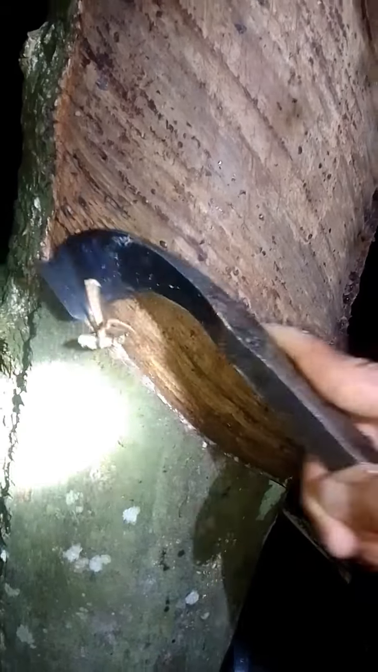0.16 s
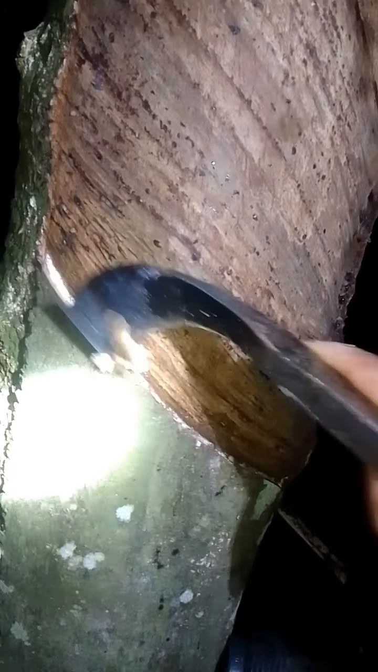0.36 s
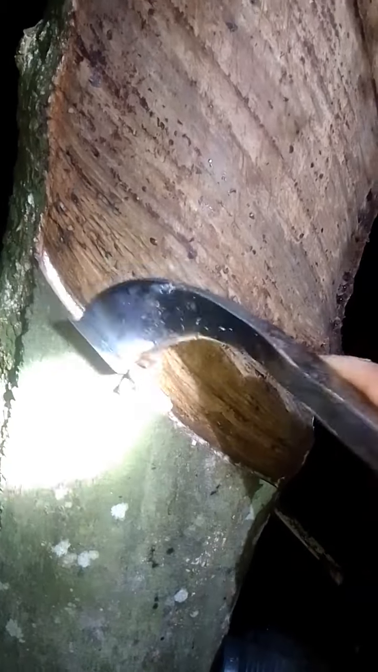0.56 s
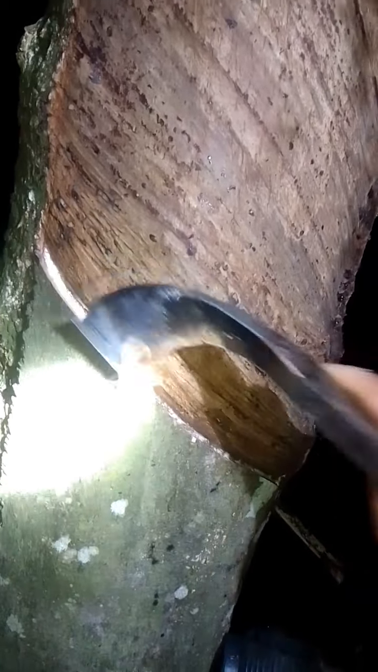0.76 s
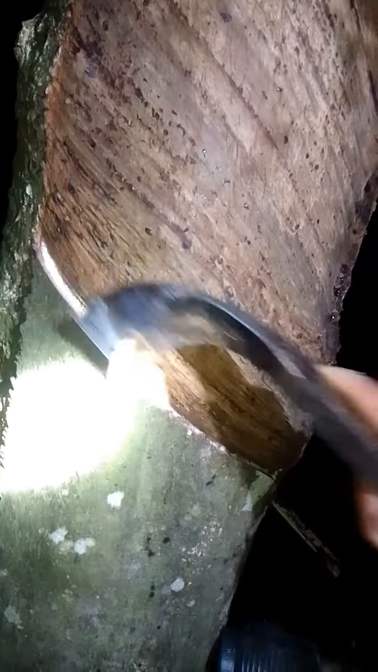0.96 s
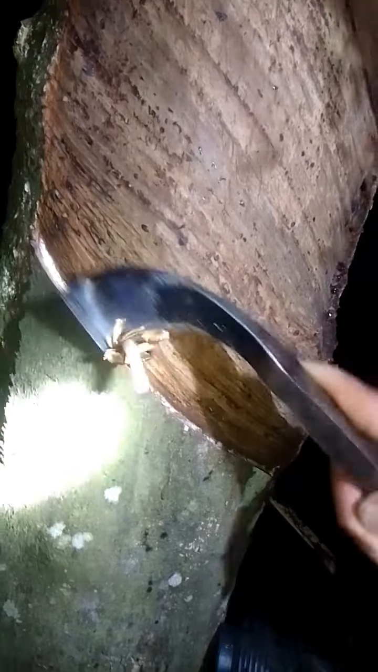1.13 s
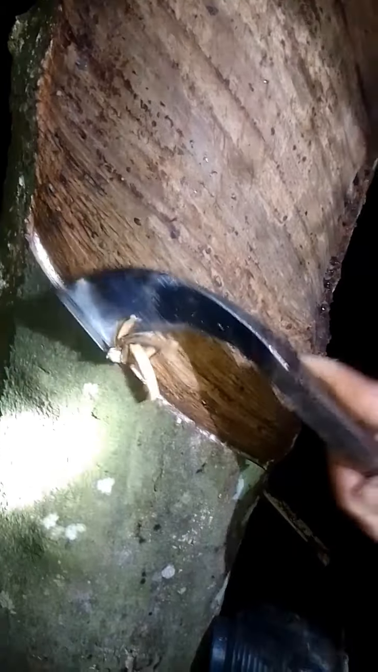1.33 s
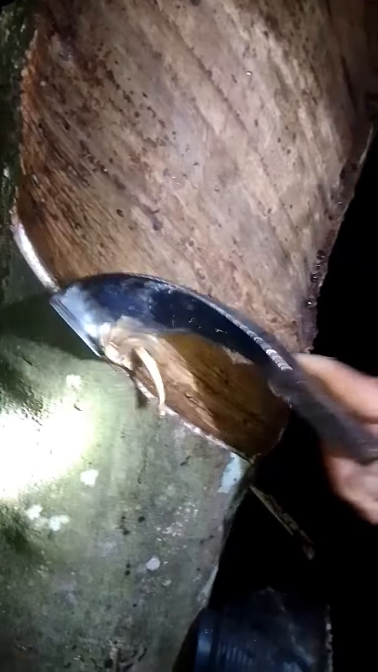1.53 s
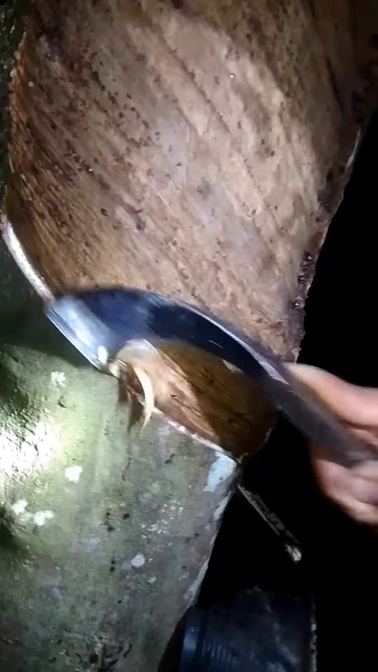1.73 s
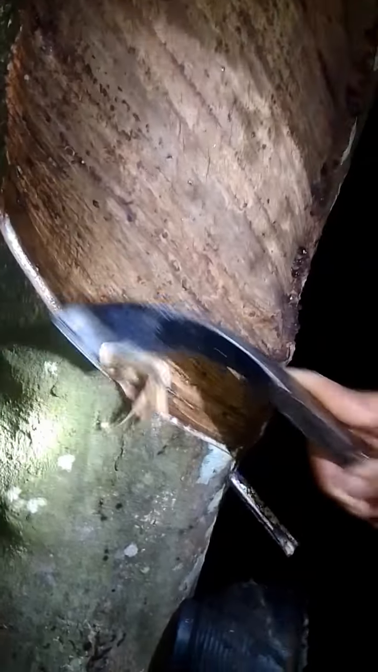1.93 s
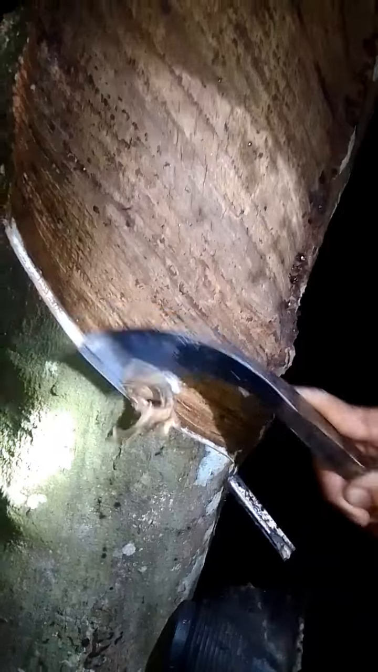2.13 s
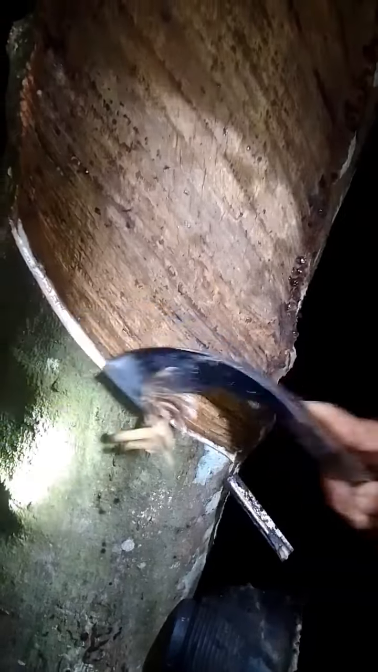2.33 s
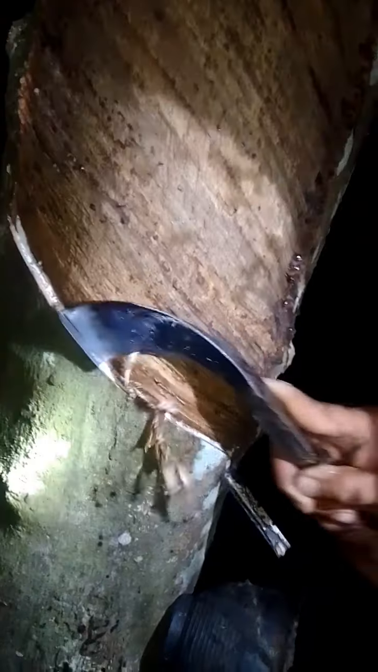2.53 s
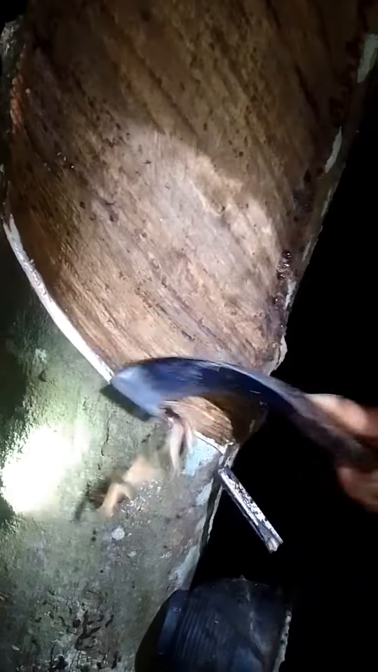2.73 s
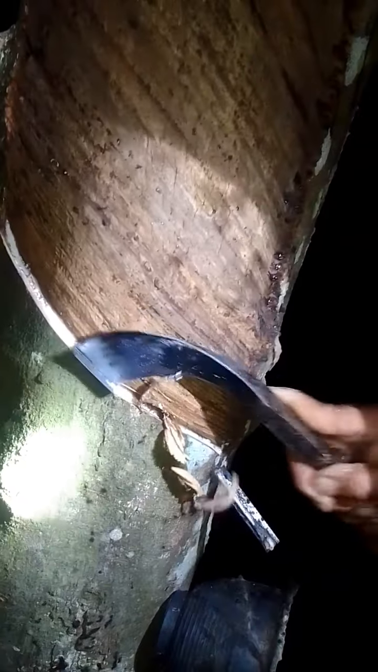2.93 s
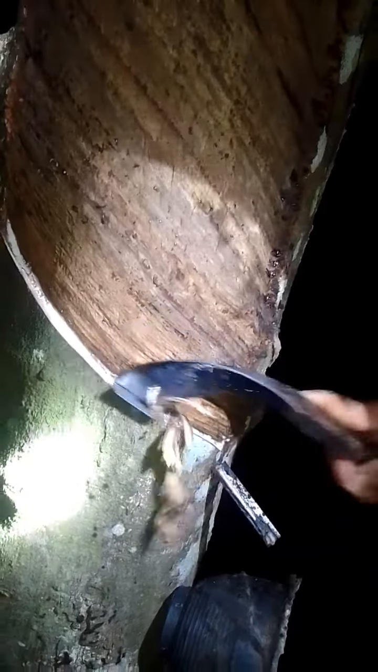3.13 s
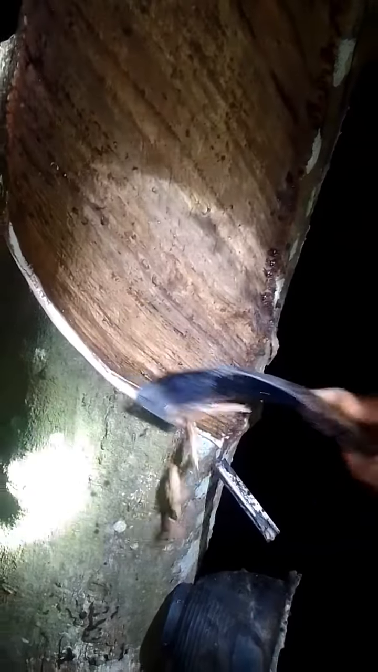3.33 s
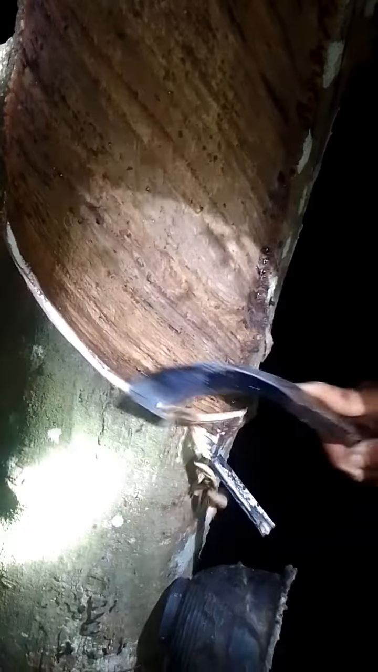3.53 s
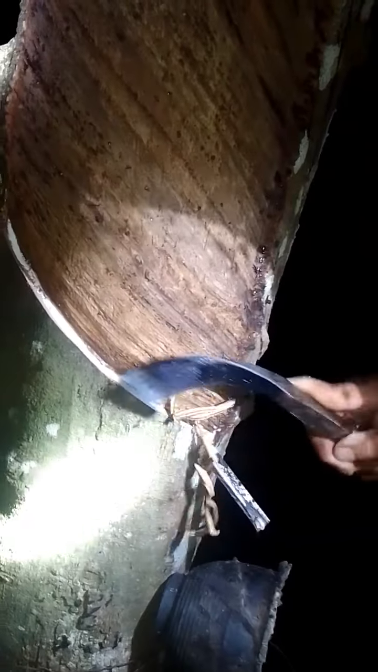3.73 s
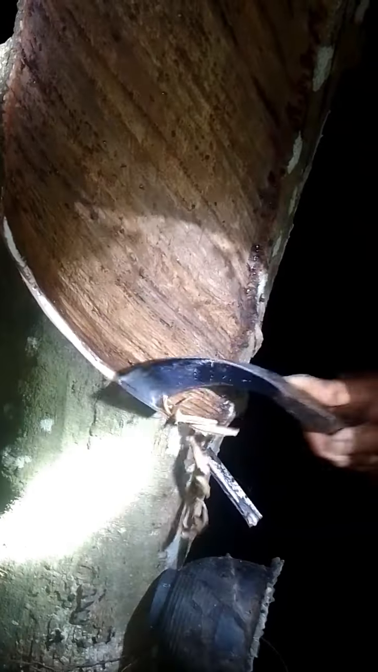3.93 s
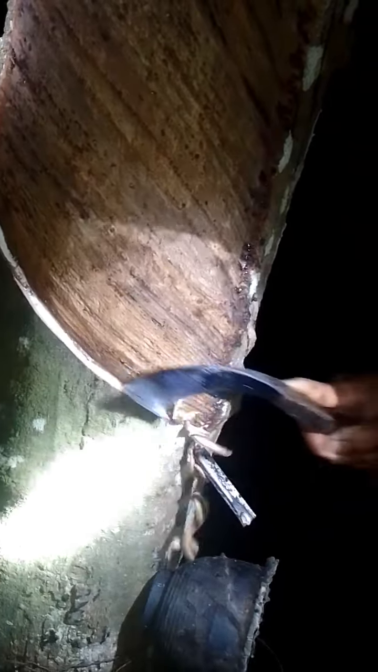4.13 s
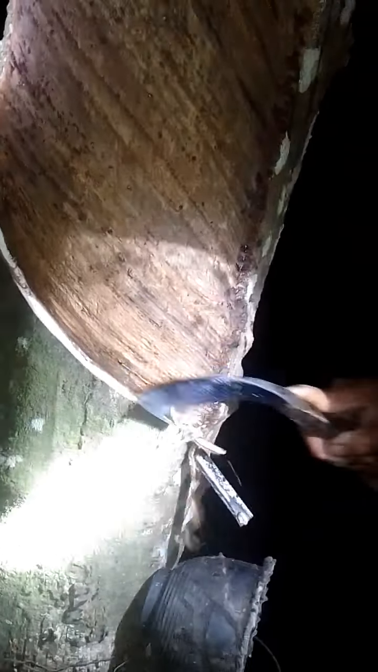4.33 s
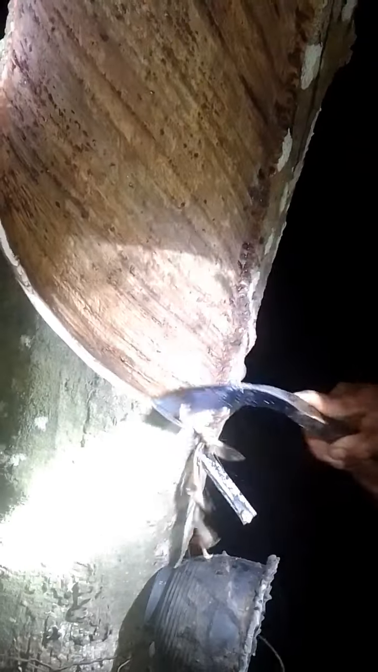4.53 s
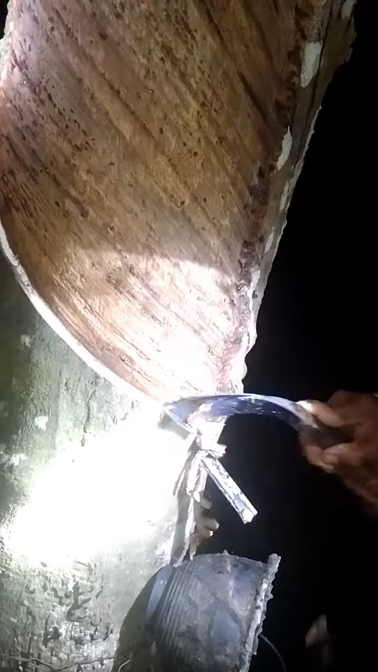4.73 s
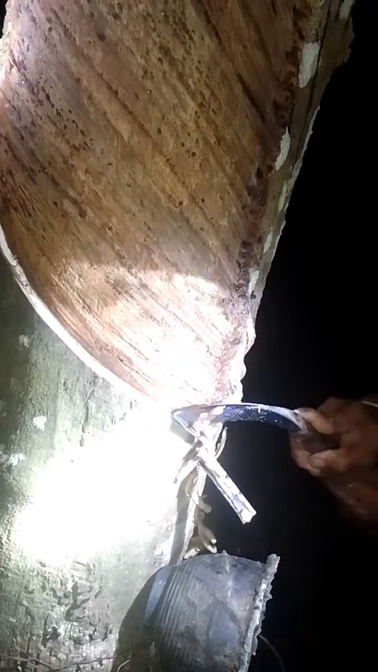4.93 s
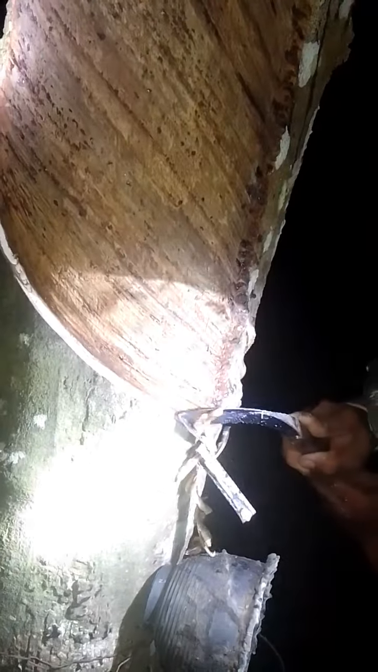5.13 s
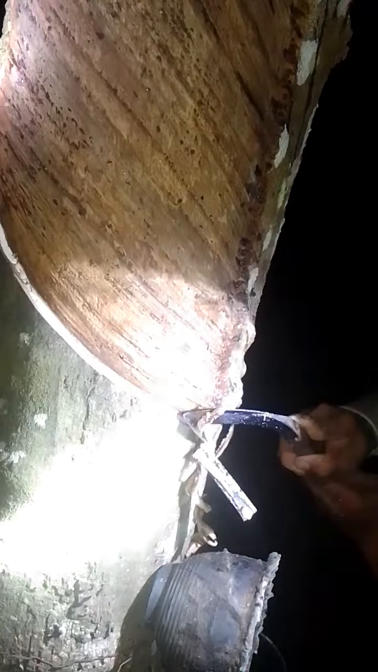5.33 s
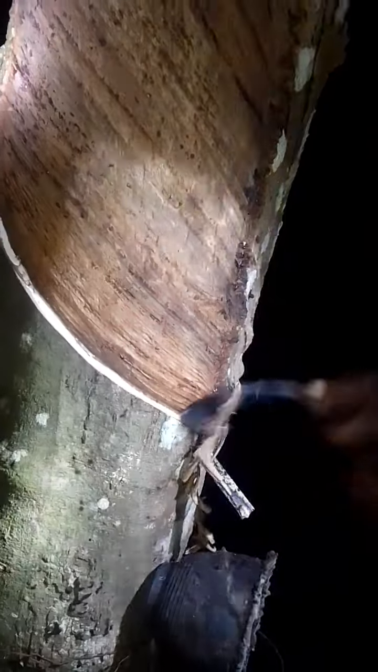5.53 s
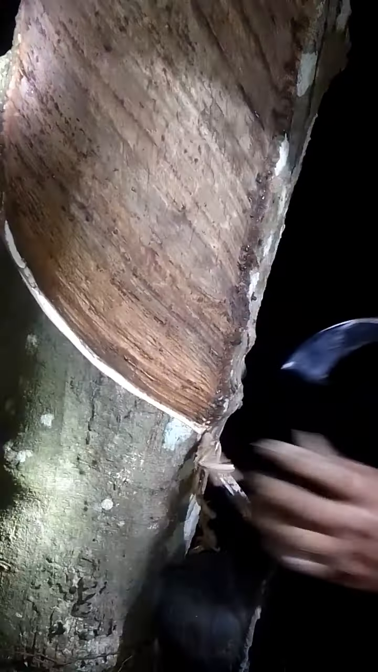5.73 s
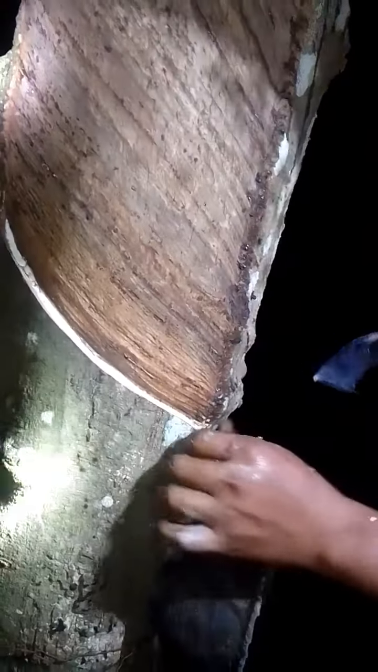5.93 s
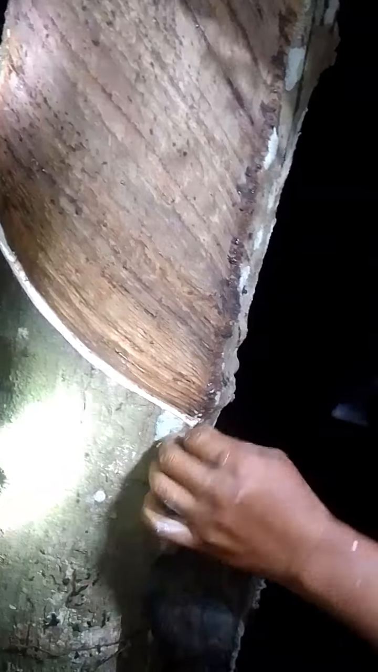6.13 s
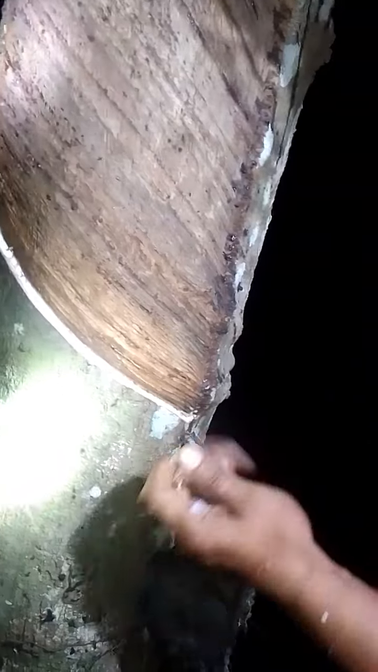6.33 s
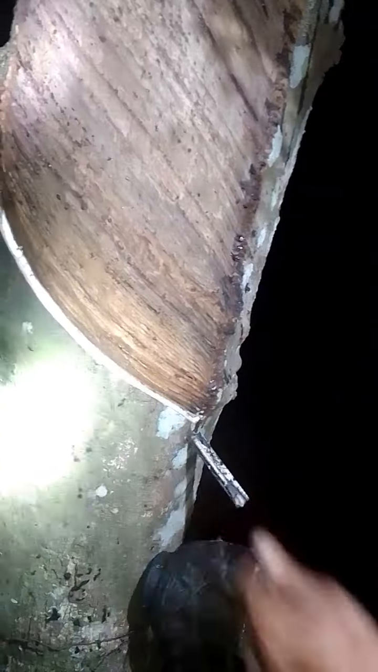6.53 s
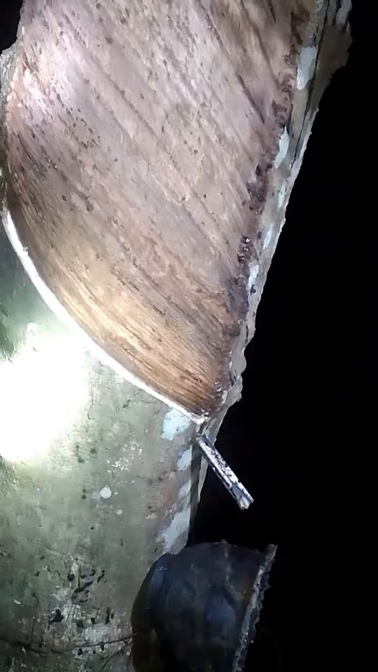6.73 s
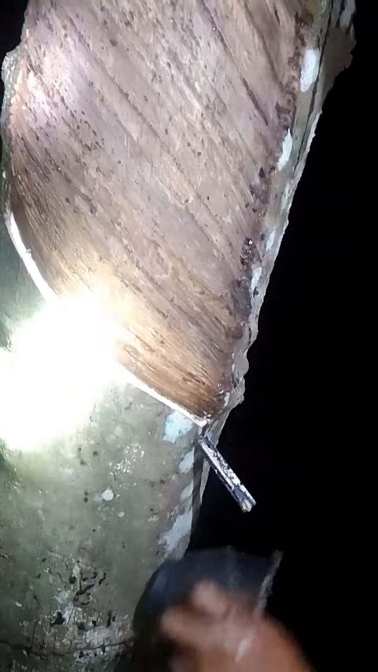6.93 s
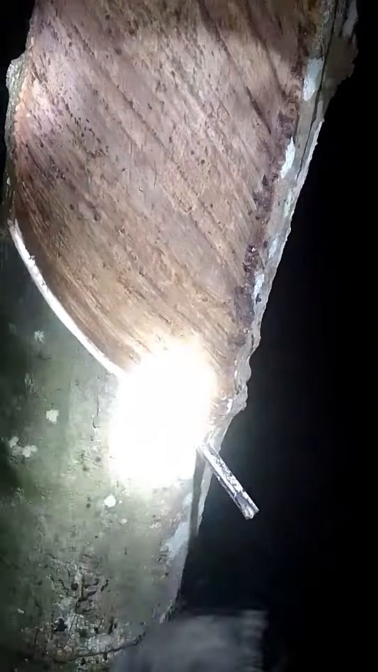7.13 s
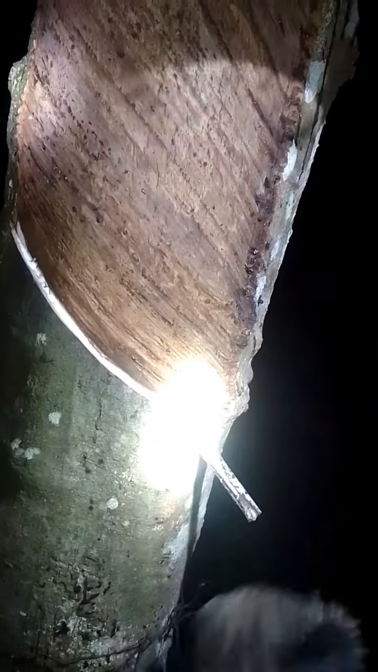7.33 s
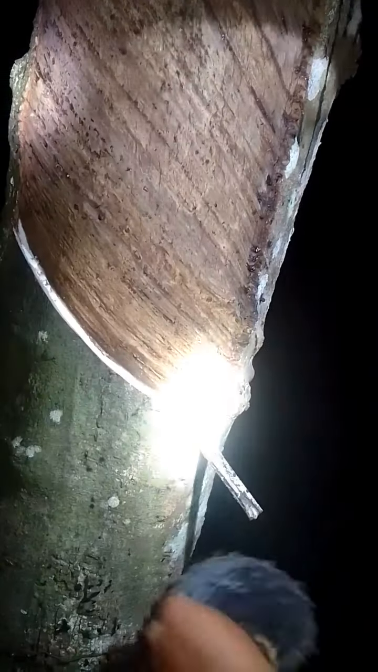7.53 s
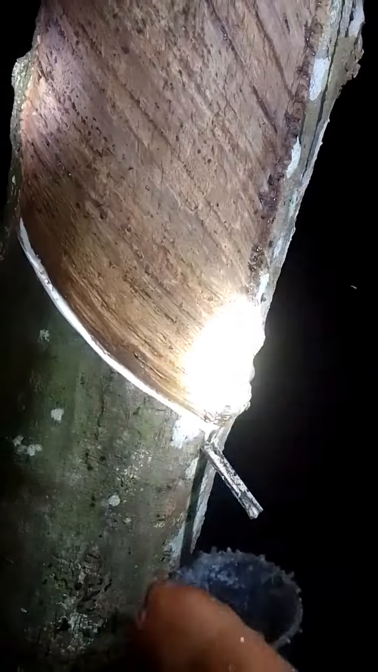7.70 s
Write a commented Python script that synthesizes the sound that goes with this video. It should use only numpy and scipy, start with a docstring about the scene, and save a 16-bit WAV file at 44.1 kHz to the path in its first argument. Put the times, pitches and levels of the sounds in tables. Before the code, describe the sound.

Very close to the microphone, a hooked blade shaves bark in short, dry rasps, about four or five a second, with small metallic ticks. A dull knock jolts the microphone around two and a half seconds. The scrapes grow thinner and hissier, then stop; a hand rubs the bark softly, and a plastic cup ticks and knocks hollowly. A cricket trills throughout over faint night insect noise in still open air.

```python
"""A hooked knife shaves bark off a rubber tree at night in short pulls, a phone held a hand's width away.
Uneven slips of tearing fibre, scaled by the pressure of each pull, drive blade and trunk resonances.
Knocks jolt the phone; at the end a hand picks the shavings off the spout and lifts the plastic cup:
rubbing noise, ticks and hollow modes. A cricket chirps in sliding tones nearby;
behind it lie bands of night noise that rise, fall and flicker, still air and one thin high whine."""
import sys
import numpy as np
from scipy import signal
from scipy.fft import rfft, irfft
from scipy.io import wavfile
from scipy.ndimage import uniform_filter1d

SR = 44100
rng = np.random.default_rng(int(sys.argv[2]) if len(sys.argv) > 2 else 0)


def int16_out(signal):
    """Quantize to a 16-bit WAV file."""
    q = np.round(np.clip(np.atleast_2d(signal).T, -1, 1) * 32767)
    wavfile.write(sys.argv[1], SR, q.astype(np.int16))


N = 346626
TIME = np.arange(N) / SR

# In mode and band tables width_hz is the width of each filter pass; level_db is relative.
# blade under load: pitch_hz, width_hz, level_db
BLADE_MODES = [(1450, 170, -17.5), (1816.5, 297, -12), (2030.5, 182, 0.5), (2124, 386, -2),
               (2300, 1260, -5.5), (2515, 150, -1.5), (2670, 180, -9.5), (2900, 260, -10.5),
               (3028, 110, -20.5), (3388, 130, -35), (4062, 360, -13.5), (5190, 970, -40.5),
               (6330, 120, -45)]
# blade ringing freely: pitch_hz, width_hz, level_db
RING_MODES = [(2480, 12, 0), (2920, 24, -7), (8500, 25, -36)]
# trunk: pitch_hz, width_hz, level_db
TRUNK_MODES = [(530, 1000, -22.5), (764, 480, -14.5), (980.4, 200, 2)]
# thin edge of the blade: pitch_hz, width_hz, level_db
EDGE_MODES = [(6810, 90, -3.5), (7460, 80, -0.5)]
# tearing hiss: centre_hz, width_hz, level_db
FIBRE_BANDS = [(4960, 1700, -1), (7400, 3400, -12.5), (10900, 3700, 1.5), (14100, 2700, 6)]
# blade touches and lift-offs: start_s, blow_db, free_ring_db, trunk_db
TOUCHES = [(0.6548, -46, -12, -47), (1.1044, -42, -12, -46), (1.5385, -39, -21, -42),
           (2.4384, -37, -19, -40), (2.4568, -46, -24, -23), (2.495, -34, -11.5, -31),
           (2.8336, -49, -6.5, -33), (2.9434, -54, -21.5, -39), (3.032, -31, -31, -47),
           (3.346, -32, -29.5, -53), (3.459, -49, -10.5, -50), (3.4741, -59, -26, -48),
           (3.527, -51, -24.5, -35), (3.6893, -44, -12.5, -55), (3.76, -44, -26, -30),
           (3.7935, -47, -38, -64), (5.358, -35, -37, -50), (5.6192, -51, -18, -57),
           (5.64, -51, -24.5, -57), (5.658, -43, -16.5, -54.5), (5.683, -52, -12, -57)]
RING_SHARE_DB = -24  # share of the cutting that rings the blade freely
UPPER_HZ = 2300  # modes above depend on the angle of the pull
TOP_MODES_HZ = 3200  # modes above answer to the tearing fibres as much as to the pressure
TOP_MODES_DB = 20
UPPER_EARLY_S = 0.0071  # the edge skims the bark before it sinks in


def knife():
    """Fibres tear in uneven slips; the hand judders, so the pressure throbs and drives blade and trunk."""
    cut, wood, hiss, song, upper = pressure()
    slips = grit(per_s=7000, spread_db=2) * undb(1.55 * walk(90))
    start_s, blow_db, free_db, wood_db = np.transpose(TOUCHES)
    touch = blows(start_s, blow_db, ms=1.5)

    upper = np.maximum(upper, np.roll(upper, -int(UPPER_EARLY_S * SR)))
    top = undb(TOP_MODES_DB) * np.sqrt(upper * hiss)
    pushes = [soft(gain * slips + touch, 6500) for gain in (cut, upper, top)]

    # the grip on the bark shifts, so each mode is driven now harder, now softer
    blade = np.zeros(N)
    for k, mode in enumerate(BLADE_MODES):
        push = pushes[int(mode[0] > UPPER_HZ) + int(mode[0] > TOP_MODES_HZ)]
        blade += (-1) ** k * body(push * undb(2.5 * walk(30)), [mode])

    ring_push = undb(RING_SHARE_DB) * cut * slips + clicks(start_s, free_db)
    ring = body(ring_push, RING_MODES, free=True)

    trunk = steep(blows(start_s, wood_db, ms=1), 1270, 540)
    for k, mode in enumerate(TRUNK_MODES):
        trunk += (-1) ** k * body(wood * slips * undb(3 * walk(15)), [mode])

    fibres = slips + 0.67 * rng.standard_normal(N)
    edge = sum(body(song * fibres * undb(4 * walk(12)), [mode]) for mode in EDGE_MODES)
    tearing = body(hiss * fibres, FIBRE_BANDS)
    return blade + ring + trunk + edge + tearing


# pulls of the knife: bite_s, rise_s, length_s, bite_under_top_db, top_db, lift_off_db,
# trunk_share_db, fibre_hiss_db, edge_singing_db, upper_modes_db
PULLS = [(0.02, 0.027, 0.084, -14.5, -25, -31, -16.5, -43, -34, 0),
         (0.32, 0.049, 0.11, -17.5, -25, -27.5, -22.5, -43, -32, 0.5),
         (.567, .03, 0.077, -15, -22.5, -25, -18.5, -44.5, -33.5, 0),
         (0.79, 0.042, 0.091, -12, -22, -28, -15.5, -44.5, -35.5, 0.5),
         (1.019, 0.036, 0.08, -14, -17, -23.5, -19, -48.5, -40, -0.5),
         (1.236, 0.03, 0.085, -15, -21, -24.5, -17.5, -48, -41, 0),
         (1.454, 0.049, 0.083, -16.5, -21.5, -29.5, -13.5, -44, -40, 0.5),
         (1.675, .028, 0.08, -20.5, -22.5, -27, -18.5, -50, -44, 0.5),
         (1.888, 0.024, 0.078, -18, -22, -23.5, -15.5, -51, -46, -2),
         (2.11, 0.039, 0.091, -18, -19, -25.5, -16, -49, -43.5, -2),
         (2.342, 0.038, 0.1, -15, -19, -29, -15, -43, -42.5, 0),
         (2.699, 0.073, 0.14, -17.5, -20, -27.5, -16, -44.5, -40.5, -2.5),
         (3.161, 0.026, 0.099, -8, -22, -27.5, -24.5, -47.5, -42, -5),
         (3.378, 0.045, .07, -8.5, -23.5, -29.5, -15.5, -41, -39.5, -1.5),
         (3.614, 0.045, 0.067, -16.5, -24, -28.5, -18, -41.5, -36, -1.5),
         (3.843, 0.026, 0.088, -13.5, -26.5, -34, -12.5, -39, -41, -0.5),
         (4.07, 0.034, 0.076, -14.5, -29, -30, -19, -38.5, -38, 1.5),
         (4.285, 0.033, 0.079, -14, -28, -33.5, -19, -36.5, -38, 2),
         (4.507, 0.029, 0.071, -14.5, -28.5, -38.5, -16, -35.5, -39, 2.5),
         (4.71, 0.035, 0.067, -11, -26, -33, -17, -37.5, -37, 0),
         (4.914, 0.026, 0.067, -12, -32, -37, -20.5, -35.5, -37, 1),
         (5.118, 0.024, 0.044, -15, -35, -35, -18, -37, -40, -2),
         (5.323, 0.026, 0.027, -11.5, -36.5, -30, -27.5, -35, -45, -1.5),
         (5.611, 0.024, 0.069, -16, -39, -52.5, -15.5, -30, -29.5, -2)]
# blade scuffing the bark as it slides back: start_s, rise_s, length_s, top_db,
# trunk_share_db, fibre_hiss_db, edge_singing_db
SCUFFS = [(0.188, 0.069, 0.045, -51, -39, -42, -28), (0.469, 0.032, 0.043, -44, -18, -40, -23),
          (0.908, 0.1, 0.041, -41, -12, -45, -35.5), (1.16, 0.048, 0.043, -53, -13, -41, -29.5),
          (2.023, 0.062, 0.055, -49, -25, -45, -37), (2.492, .008, 0.05, -49.5, -12.5, -33, -40),
          (2.525, .012, 0.02, -43.5, -2.5, -30.5, -47), (2.584, 0.011, 0.035, -64, 19, -44, -48),
          (2.929, .015, 0.016, -55, -8, -29, -17.5), (3.022, 0.0065, 0.0081, -41.5, -5.5, -56, -51),
          (3.31, 0.038, 0.024, -55, -16, -47, -40), (3.486, 0.027, 0.046, -59, 0, -30, -19),
          (3.747, 0.018, 0.021, -57, -2, -35, -14), (4.64, 0.027, 0.032, -48.5, -26, -42, -56.5),
          (5.683, 0.019, 0.018, -44.5, -20, -48, -36.5)]
# blade resting on the bark between pulls: level_db, trunk_share_db, fibre_hiss_db, edge_singing_db
REST = (-61, -15.5, -32, -38)
# the cut deepens along a pull
TRUNK_GROWS_DB, HISS_GROWS_DB, UPPER_GROWS_DB = 5.5, 5.5, 1.5


def pressure():
    """Gains of low blade modes, trunk, hiss, singing, upper modes; the blade rests until the last pull."""
    bite_s, rise_s, length_s, bite_db, top_db, end_db, *pull_shares = np.transpose(PULLS)
    *scuff_when, scuff_db, scuff_trunk_db, scuff_hiss_db, scuff_song_db = np.transpose(SCUFFS)
    rest_db, *rest_shares = REST
    rest = undb(rest_db) * (TIME < bite_s[-1])
    layers = zip([0, *pull_shares],
                 [0, scuff_trunk_db, scuff_hiss_db, scuff_song_db, 0],
                 [0, *rest_shares, 0],
                 [0, TRUNK_GROWS_DB, HISS_GROWS_DB, 0, UPPER_GROWS_DB])
    gains = []
    for pull_share, scuff_share, rest_share, grows_db in layers:
        first_db = top_db + pull_share - grows_db / 2
        last_db = end_db + pull_share + grows_db / 2
        pulls = contact(bite_s, rise_s, length_s, first_db, last_db, bite_db)
        scuffs = contact(*scuff_when, scuff_db + scuff_share, scuff_db + scuff_share)
        gains.append(pulls + scuffs + rest * undb(rest_share))
    return gains


# knocks that jolt the phone: start_s, level_db, pitch_hz, low_thump_db
KNOCKS = [(2.5253, -32.5, 1170, -16.5), (2.544, -31.5, 1110, -20.5), (2.547, -22, 950, -11),
          (2.598, -44.5, 1440, -6)]


def knocks():
    """A short push on the case with a sharper edge, a crack that scatters away, thump and rumble via the hand."""
    start_s, level_db, pitch_hz, thump_db = np.transpose(KNOCKS)
    push = tap(start_s + 0.00107, level_db + 5.5, pitch_hz, ms=0.65)
    edge = tap(start_s + 0.00091, level_db, 2.25 * pitch_hz, ms=0.36)
    scatter = blows(start_s, level_db - 9.5, ms=1.86) + blows(start_s, level_db - 14.5, ms=8)
    crack = soft(steep(scatter, 2200, 2800), 4500)
    thump = soft(band(clicks(start_s + 0.0018, level_db + thump_db + 35), 230, 170), 3000)
    rumble = steep(blows(start_s, level_db + thump_db - 1, ms=20), 280, 398.5)
    return crack + thump + rumble - push - edge


# hand rubbing bark and cup: start_s, rise_s, length_s, top_db, end_db, palm_thud_db
RUBS = [(5.849, 0.089, 0.17, -45.5, -56, 3.5), (6.058, .02, 0.091, -64, -63, -2),
        (6.21, .024, .13, -69.5, -79, 5.5), (6.498, 0.25, 0.31, -57, -67, -2.5),
        (6.971, 0.015, 0.032, -54.5, -69, -2), (7.007, 0.034, 0.051, -55, -52.5, -12),
        (7.093, .014, 0.064, -53.5, -66, 6), (7.156, .027, .03, -55, -61, -1),
        (7.201, 0.011, 0.072, -53, -71, -7.5), (7.688, .012, 0.069, -61, -62, -15),
        (7.746, 0.012, 0.15, -62.5, -75, 4)]
# cup ticking in its wire: start_s, level_db, contact_pitch_hz, hollow_share_db, crack_db
TICKS = [(6.447, -48.5, 1860, -29, 3.5), (6.957, -52, 2310, -31, -11), (6.981, -50.5, 1530, -23, -7),
         (6.991, -66, 1450, -25, -13), (7.049, -57, 1790, -23, -1), (7.084, -50, 2330, -20, -26),
         (7.099, -38, 2030, -29, -32), (7.103, -53, 1960, -24, -33), (7.127, -44, 2380, -29, -25),
         (7.171, -47.5, 2310, -29, -24), (7.185, -48.5, 2290, -31, -24.5), (7.215, -45, 1270, -27, -28),
         (7.241, -44.5, 1650, -33.5, -25), (7.514, -59.5, 1825, 2, -27), (7.62, -72, 1760, 10.5, -19),
         (7.646, -41, 1830, -9, -41), (7.651, -27.5, 1800, -4, -39), (7.661, -32, 1770, -4, -37),
         (7.675, -35.5, 1700, -4.5, -32), (7.725, -41, 1980, -21, -41), (7.735, -53.5, 1910, 2.5, -20),
         (7.84, -47, 2430, -19, -18)]
# cup: pitch_hz, width_hz, level_db
CUP_MODES = [(1265, 290, -3), (1494, 150, -6.5), (1735, 115, -3.5), (1992, 140, 0), (2300, 130, -1),
             (2555, 120, -16)]
# hollow of the cup: pitch_hz, width_hz, level_db
HOLLOW_MODES = [(403, 440, -8), (590, 250, -14.5), (805, 155, 4.5)]


def hand():
    """Skin drags over bark and plastic in small slips; the cup ticks and rings hollow."""
    *when, top_db, end_db, thud_db = np.transpose(RUBS)
    skin = grit(per_s=8400, spread_db=3) * undb(2.5 * walk(60))
    rub = skin * contact(*when, top_db, end_db)
    palm = skin * contact(*when, top_db + thud_db, end_db + thud_db)

    start_s, tick_db, pitch_hz, hollow_db, crack_db = np.transpose(TICKS)
    knock = tap(start_s - 0.001, tick_db, pitch_hz, ms=0.863)
    rattle = blows(start_s, tick_db, ms=2.5)
    cup_push = undb(3) * rub + undb(-5.5) * knock + undb(-1.5) * rattle
    cup = 0.53 * knock + body(cup_push, CUP_MODES)
    scrape = soft(steep(undb(-4.5) * rub + undb(-0.5) * rattle, 1900, 1800), 2800)

    hollow_tap = tap(start_s - 0.001, tick_db + hollow_db, np.full(len(start_s), 750), ms=0.602)
    hollow_rattle = blows(start_s, tick_db + hollow_db, ms=6.2)
    hollow = body(hollow_tap + hollow_rattle, HOLLOW_MODES)
    crack = soft(steep(blows(start_s, tick_db + crack_db, ms=1), 2900, 4500), 5400)
    thud = steep(palm, 196, 180)
    return cup + scrape + hollow + crack + thud


# cricket chirps: start_s, wing_strokes, first_stroke_db, swell_db, loudest_pitch_hz
CHIRPS = [(0.0667, 4, -55, -6, 4000), (.374, 5, -61, 13, 4500), (.4988, 3, -65.5, 4, 4670),
          (.623, 5, -50, 2.5, 4460), (.9127, 5, -52.5, -5, 4270), (1.114, 5, -54.5, -4, 4230),
          (1.336, 5, -50, -1.5, 4270), (1.462, 2, -71, -2, 4200), (1.5356, 5, -54, 2, 4320),
          (1.758, 5, -53, 2, 4260), (1.9783, 5, -51.5, -.5, 4290), (2.2045, 6, -54, 8, 4340),
          (2.353, 2, -42, -3, 4230), (2.405, 4, -47.5, -3, 4240), (2.5583, 5, -50.5, 5, 4250),
          (2.683, 2, -55.5, -0.5, 4370), (2.8056, 5, -48.5, -6, 4330), (3.026, 5, -58.5, 10, 3900),
          (3.149, 2, -54.5, -3, 4240), (3.245, 5, -52.5, -2, 4480), (3.4657, 5, -54.5, -2, 4360),
          (3.712, 4, -57.5, .5, 4300), (3.9112, 5, -53, -1.5, 4280), (4.037, 2, -68.5, 10, 4020),
          (4.1265, 5, -46, -9, 4360), (4.348, 5, -45.5, -5, 4310), (4.477, 2, -69, 8, 4150),
          (4.5684, 5, -50, 5, 4320), (4.7919, 5, -55, -0.5, 4550), (4.9924, 5, -59, 1.5, 4260),
          (5.2148, 5, -63.5, 7, 4350), (5.4172, 5, -62.5, 5.5, 4510), (5.6361, 5, -58.5, 8, 4630),
          (5.8406, 5, -60, 8.5, 4540), (6.063, 5, -60.5, 4.5, 4550), (6.2603, 5, -67.5, 7, 4430),
          (6.4845, 6, -67.5, 12, 4300), (6.6865, 5, -55, -2, 4310), (6.811, 3, -66, -4.5, 4350),
          (6.908, 5, -62.5, 9, 4270), (7.032, 3, -65, -5, 4270), (7.106, 6, -65, 3.5, 4260),
          (7.3333, 5, -69, 2.5, 4320), (7.5551, 5, -71, 4.5, 4300), (7.756, 4, -67.5, 9.5, 4350)]
# short pips in the cricket band, sounding along with some chirp strokes: start_s, level_db, pitch_hz
PIPS = [(4.183, -37, 4200), (4.67, -39, 4570), (5.6435, -49.5, 4160), (6.512, -49, 4190),
        (6.6119, -41.5, 4240), (7.014, -54, 4260), (7.8364, -50, 4300)]
# how much of the slide is heard beside its loudest pitch as the phone moves: time_s, level_db
OFF_PITCH = [(0, -2.5), (.7, -5.5), (.9, -16.5), (1.9, -11.5), (2.5, -10), (2.9, 4.5), (3.5, -6),
             (4.2, -1.5), (4.9, 0.5), (5.4, -7.5), (6.9, -11.5), (7.6, -2.5)]
STROKE_LENGTH_S, STROKE_PERIOD_S = 0.019, 0.02495


def cricket():
    """Wing strokes are tones sliding down; leaves and trunk favour a different pitch as the phone moves."""
    u = np.linspace(0, 1, int(STROKE_LENGTH_S * SR))
    slide_hz = 4700 - 800 * u
    out = np.zeros(N + SR)
    for start_s, strokes, first_db, swell_db, loud_hz in CHIRPS:
        strokes = int(strokes)
        off_pitch = undb(np.interp(start_s, *np.transpose(OFF_PITCH)))
        favoured = np.exp(-((slide_hz - loud_hz) / 170) ** 2)
        shape = np.sin(np.pi * u) ** 0.5 * (off_pitch + favoured)
        for k in range(strokes):
            phase, jolt = rng.random(2)
            tone = np.sin(2 * np.pi * (np.cumsum(slide_hz) / SR + phase))
            stroke_db = first_db + swell_db * k / (strokes - 1) + 5.5 * (jolt - 0.5)
            at = int((start_s + k * STROKE_PERIOD_S) * SR)
            out[at:][:len(u)] += undb(stroke_db) * shape * tone
    out = out[:N] + tap(*np.transpose(PIPS), ms=2.4)

    # an echo from the trunk, then a blur from the grove
    t = np.arange(int(0.25 * SR)) / SR
    decay = np.exp(-np.log(1000) * t / 0.3)  # 60 dB in 0.3 s
    grove = rng.standard_normal(len(t)) * decay * (t > 0.006)
    echo = 0.17 * np.roll(out, int(0.005 * SR))
    return out + echo + undb(-37.5) * signal.fftconvolve(out, grove)[:N]


# rise and fall of the night noise: time_s, low_db, middle_db, high_db
NIGHT_LEVELS = [(0.0, -67, -65, -79), (0.19, -77.5, -76, -84), (0.74, -70, -66.5, -80.5),
                (1.01, -63, -67.5, -83), (1.42, -71, -70, -83), (1.71, -72.5, -76.5, -87),
                (2.69, -66.5, -61.5, -90.5), (2.93, -72, -68.5, -87), (3.17, -90, -78.5, -90),
                (3.33, -70, -70, -84), (3.87, -70.5, -73.5, -86.5), (4.64, -73.5, -74, -79.5),
                (5.43, -76.5, -78, -86), (5.93, -68.5, -77, -83), (6.37, -76.5, -79, -91),
                (6.72, -79, -75, -87.5), (7.6, -81, -82.5, -96), (7.86, -73, -72.5, -85)]
# night noise bands: centre_hz, width_hz, level_db
NIGHT_BANDS = [(1200, 43, -11.5), (1737, 240, -1.5), (1900, 230, -8.5), (2290, 180, -7.5), (3330, 410, -6),
               (3794, 260, 0.5), (4400, 240, -2), (4730, 240, -7), (5140, 140, -4.5), (5540, 280, -3)]
# spectrum of still air: frequency_hz, density_db (per Hz, relative)
AIR = [(25, -13.5), (60, 4), (200, 0), (700, -3.5), (3000, -7.5), (6000, -21.5), (12500, -24.5),
       (14100, -21), (16000, -33)]
AIR_RMS_DB = -80.5
WHINE_HZ, WHINE_DB = 14159, -93  # mean pitch; level before flicker and the sway with the high bands


def night():
    """Low, middle and high noise bands rise, fall and flicker over coloured still air and a thin high whine."""
    time_s, *groups = np.transpose(NIGHT_LEVELS)
    low_db, middle_db, high_db = (np.interp(TIME, time_s, db) for db in groups)
    bands = np.zeros(N)
    for centre_hz, width_hz, band_db in NIGHT_BANDS:
        if 1500 < centre_hz < 3000:
            group_db = low_db
        elif centre_hz < 4600:
            group_db = middle_db
        else:
            group_db = high_db
        flicker_db = 1.5 * walk(5) + 3 * walk(35)
        noise = unit(steep(rng.standard_normal(N), centre_hz, width_hz))
        bands += undb(group_db + band_db + flicker_db) * noise

    hz = np.fft.rfftfreq(N, 1 / SR) + 1
    air_hz, density_db = np.transpose(AIR)
    colour = undb(np.interp(np.log(hz), np.log(air_hz), density_db))
    air = unit(irfft(rfft(rng.standard_normal(N)) * colour, N))

    whine_hz = WHINE_HZ + 6 * walk(24)
    whine_db = WHINE_DB + 2.5 * walk(12) + 0.5 * (high_db + 90.5)
    whine = undb(whine_db) * np.sin(2 * np.pi * np.cumsum(whine_hz) / SR)
    return bands + undb(AIR_RMS_DB) * air + whine


LEAD_S, LIFT_S = 0.0056, 0.028  # lead-in before a contact; time to let go
HUSH_DB = -36.5  # how far lead-in and letting go reach down


def contact(s, rise, length, top_db, end_db, bite_db=-15.5):
    """Gain of a row of contacts: lead-in, bite, rise to the top, drift to the end, letting go."""
    t = np.array([s - LEAD_S, s, s + rise, s + length, s + length + LIFT_S]).T
    db = np.array([top_db + HUSH_DB, top_db + bite_db, top_db, end_db, end_db + HUSH_DB]).T
    out = np.zeros(N)
    for row_t, row_db in zip(t, db):
        part = slice(max(int(row_t[0] * SR), 0), int(row_t[-1] * SR))
        out[part] += undb(np.interp(TIME[part], row_t, row_db))
    return out


def grit(per_s, spread_db):
    """Random slips of very uneven size, rms 1."""
    size = undb(spread_db * rng.exponential(1, N)) * rng.standard_normal(N)
    return unit(size * (rng.random(N) < per_s / SR))


def blows(s, db, ms):
    """Short noise bursts of rough contact, each falling by 1/e every ms milliseconds."""
    t = np.arange(int(0.1 * SR)) / SR
    out = np.zeros(N + len(t))
    for row_s, row_db in zip(s, db):
        burst = rng.standard_normal(len(t)) * np.exp(-1000 * t / ms)
        out[int(row_s * SR):][:len(t)] += undb(row_db) * burst
    return out[:N]


def tap(s, db, hz, ms):
    """A few cycles under a bell-shaped envelope that peaks 2 * ms after s."""
    t = np.arange(int(6 * ms / 1000 * SR)) / SR - 3 * ms / 1000
    bell = np.exp(-(1000 * t / ms) ** 2)
    out = np.zeros(N + SR)
    for row_s, row_db, row_hz in zip(s, db, hz):
        at = int((row_s - ms / 1000) * SR)
        out[at:][:len(t)] += undb(row_db) * np.sin(2 * np.pi * row_hz * t) * bell
    return out[:N]


def clicks(s, db):
    """Single sharp impulses."""
    out = np.zeros(N)
    out[(s * SR).astype(int)] = undb(db)
    return out


def body(x, modes, free=False):
    """Neighbouring modes swing in opposite sense; free modes die away as pure exponentials."""
    through = band if free else steep
    out = np.zeros(N)
    for k, (hz, width, db) in enumerate(modes):
        out += (-1) ** k * undb(db) * through(x, hz, width) * np.sqrt(1000 / width)
    return out


def band(x, hz, width):
    """One resonance, gain 1 at its centre."""
    return signal.lfilter(*signal.iirpeak(hz, hz / width, SR), x)


def steep(x, hz, width):
    """A resonance applied twice, with dark valleys beside it."""
    return band(band(x, hz, width), hz, width)


def soft(x, hz):
    """Soft contact gives no treble: low-pass at hz."""
    return signal.sosfilt(signal.butter(4, hz, fs=SR, output="sos"), x)


def walk(rate):
    """Random levels held 1 / rate s and slewed twice."""
    k = int(SR / rate)
    steps = np.repeat(rng.standard_normal(N // k + 1), k)
    return uniform_filter1d(uniform_filter1d(steps, k), k)[:N]


def undb(db):
    """Gain of a level in dB."""
    return 10 ** (np.asarray(db) / 20)


def unit(x):
    """Scaled to rms 1."""
    return x / np.sqrt(np.mean(x ** 2))


def scene():
    """Everything reaches one microphone in the open air."""
    return (knife() + knocks() + hand() + cricket() + night())[None]


def record(dry):
    """The phone cuts the top, above 15719 Hz."""
    return signal.sosfilt(signal.ellip(10, 0.2, 60, 15719, fs=SR, output="sos"), dry)


dry = scene()
out = record(dry)
int16_out(out)
```